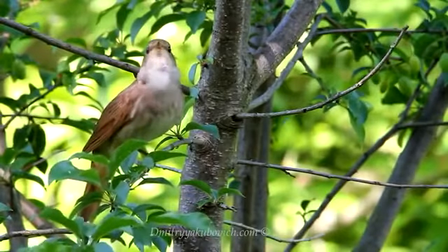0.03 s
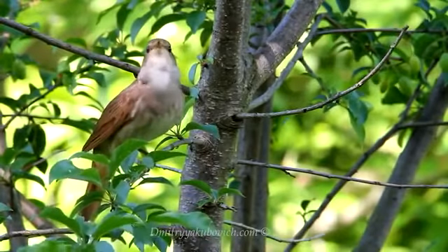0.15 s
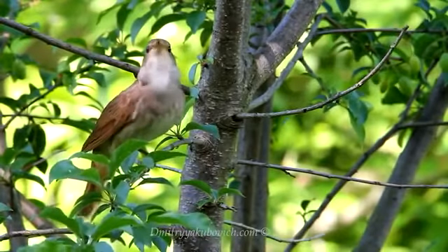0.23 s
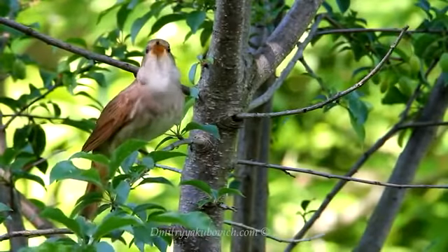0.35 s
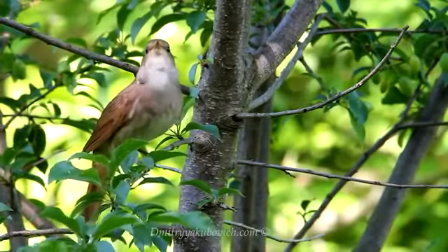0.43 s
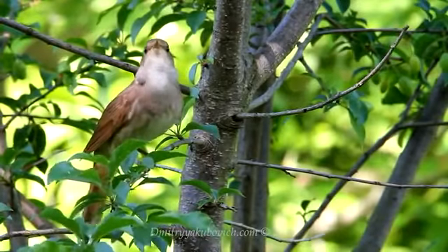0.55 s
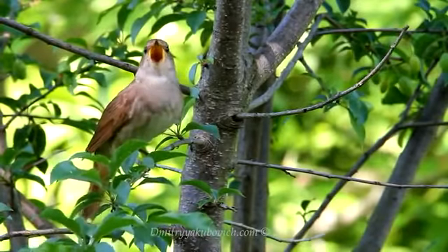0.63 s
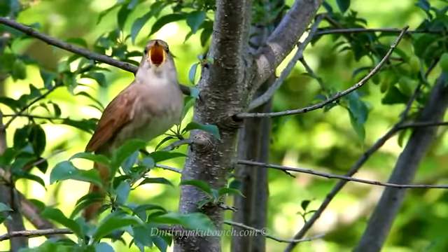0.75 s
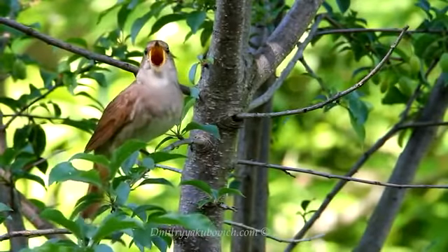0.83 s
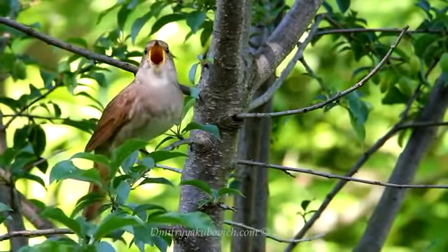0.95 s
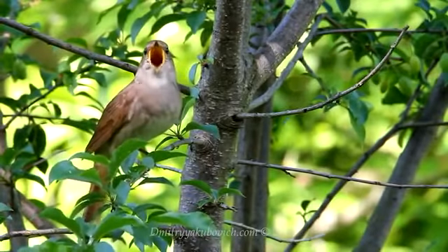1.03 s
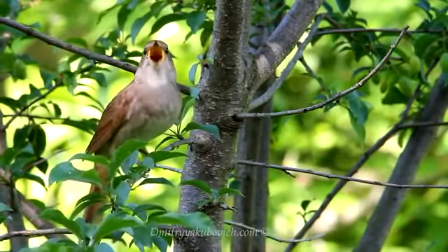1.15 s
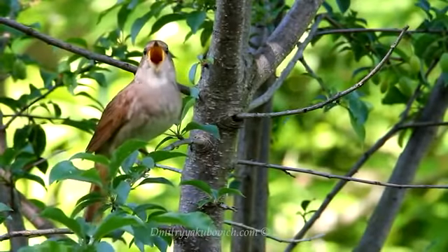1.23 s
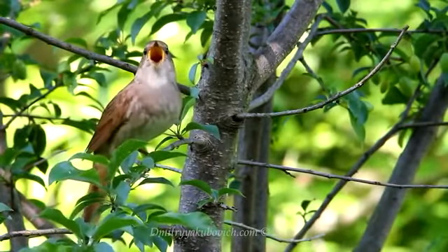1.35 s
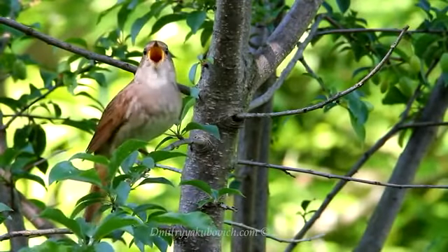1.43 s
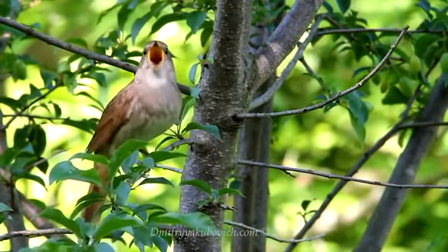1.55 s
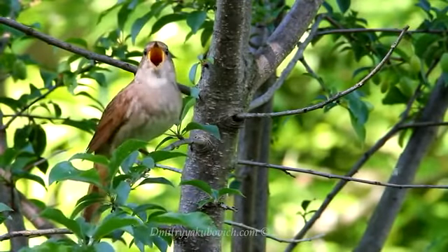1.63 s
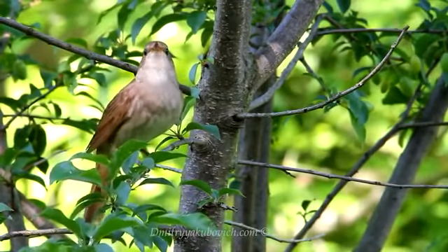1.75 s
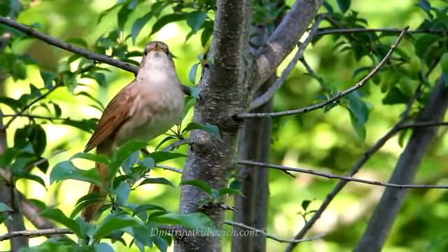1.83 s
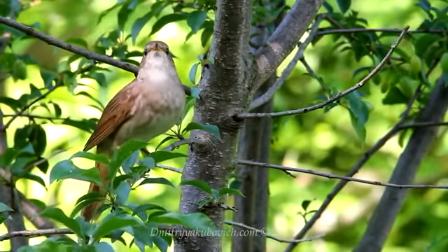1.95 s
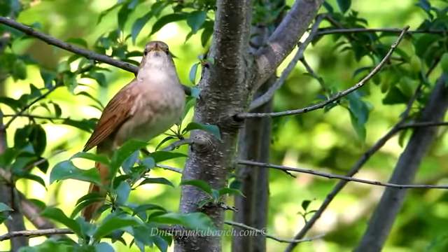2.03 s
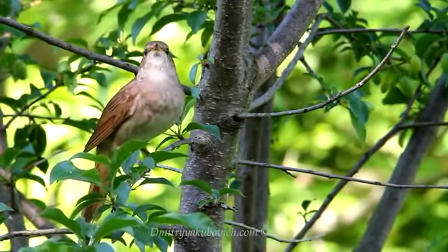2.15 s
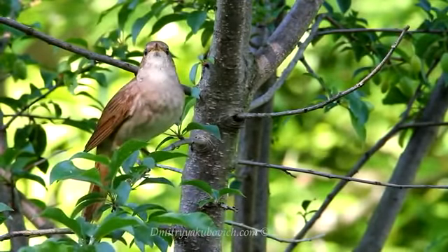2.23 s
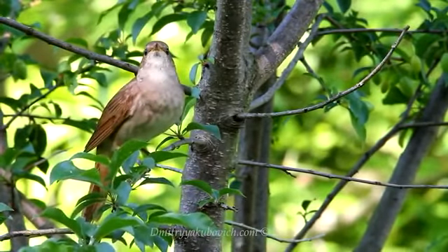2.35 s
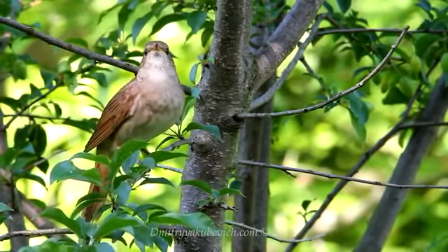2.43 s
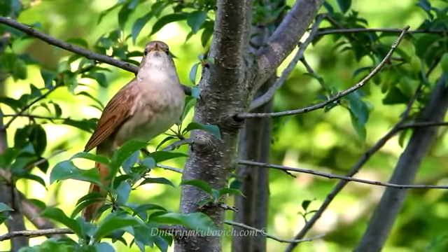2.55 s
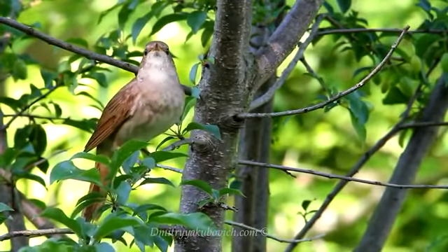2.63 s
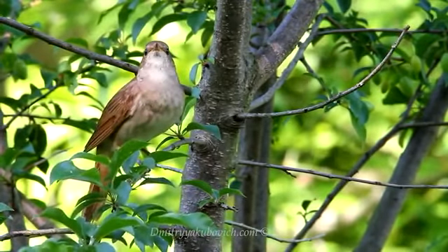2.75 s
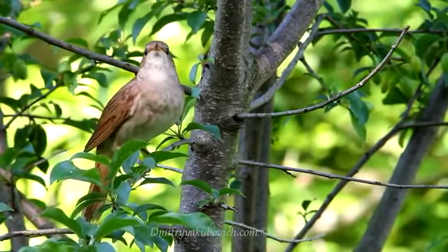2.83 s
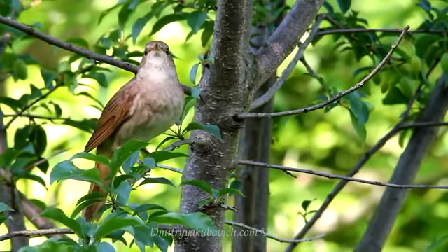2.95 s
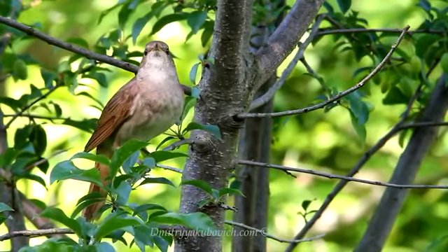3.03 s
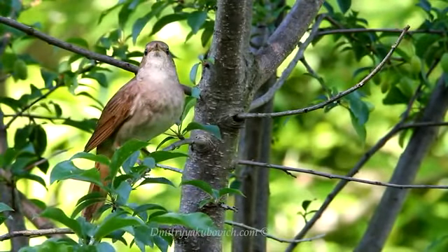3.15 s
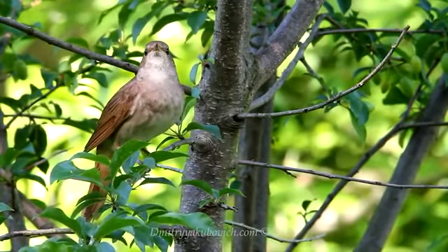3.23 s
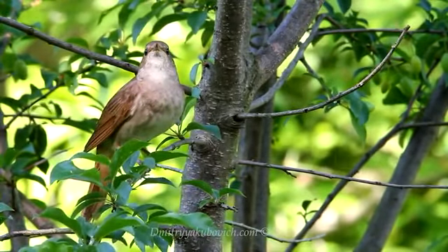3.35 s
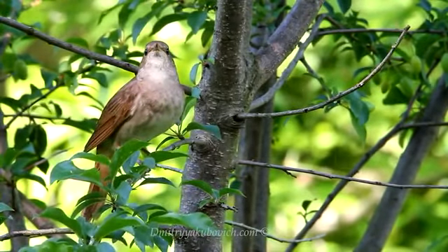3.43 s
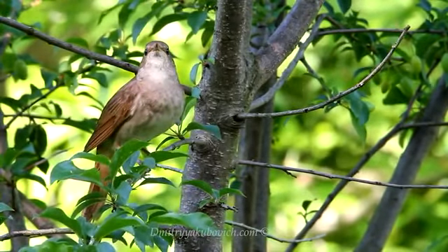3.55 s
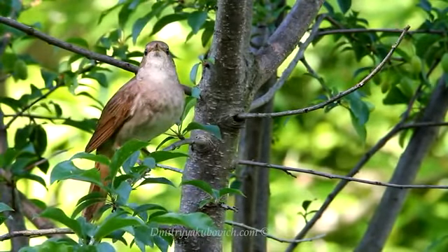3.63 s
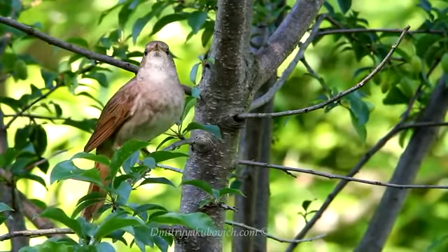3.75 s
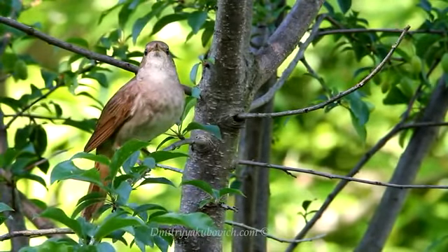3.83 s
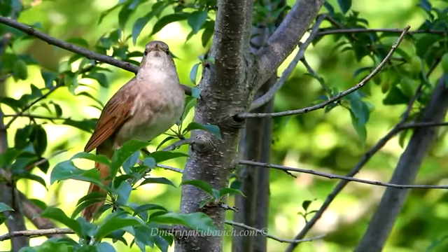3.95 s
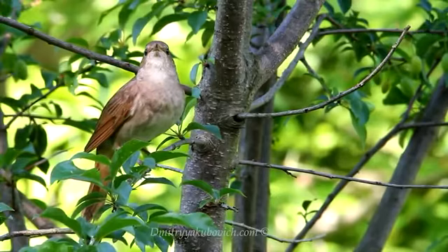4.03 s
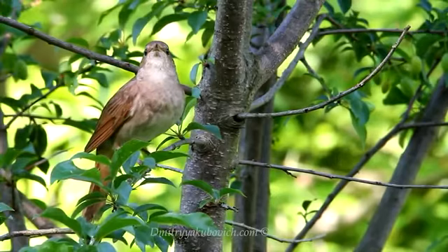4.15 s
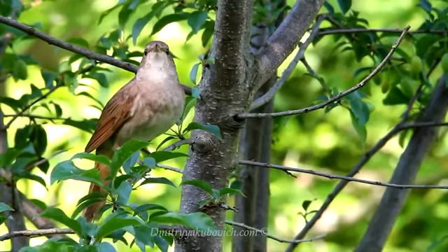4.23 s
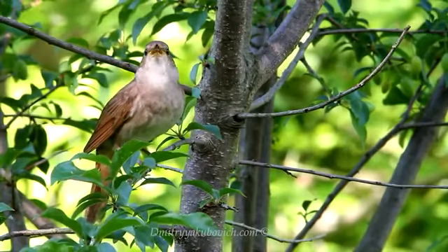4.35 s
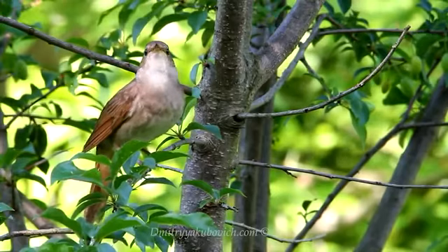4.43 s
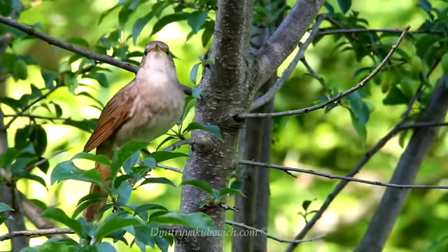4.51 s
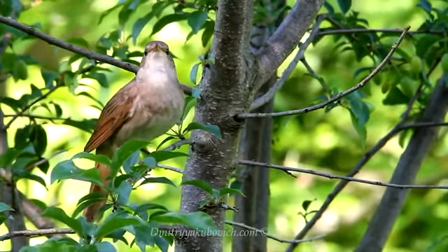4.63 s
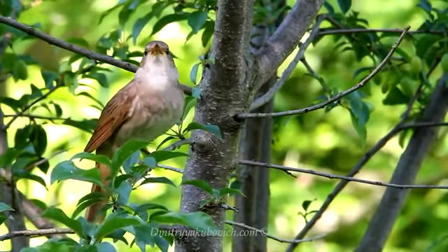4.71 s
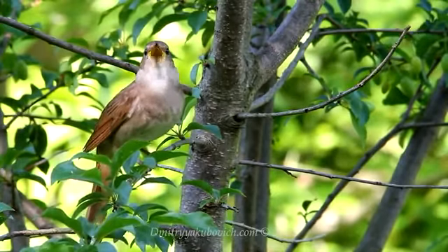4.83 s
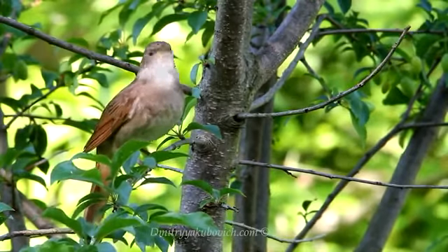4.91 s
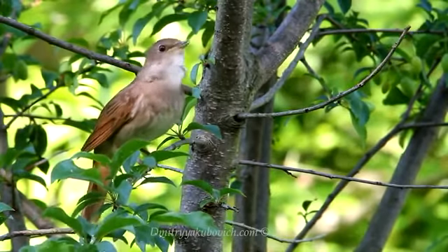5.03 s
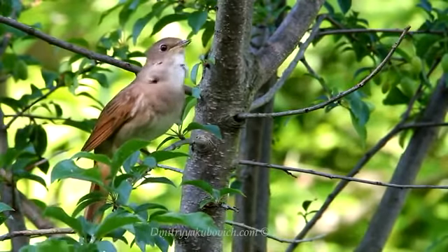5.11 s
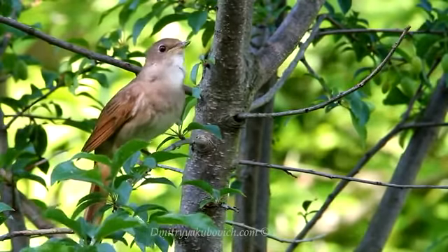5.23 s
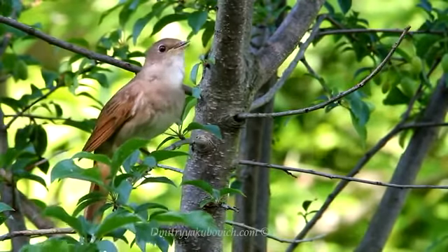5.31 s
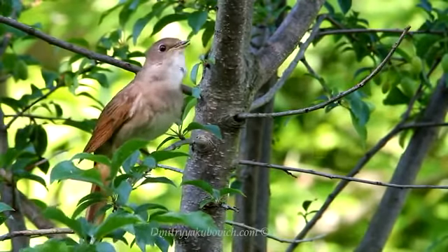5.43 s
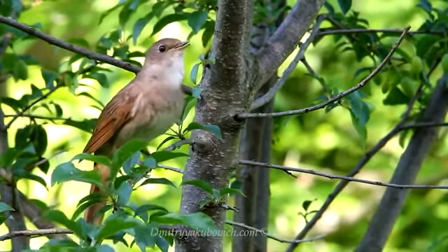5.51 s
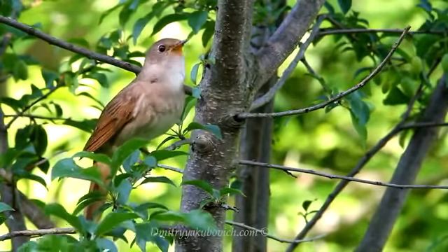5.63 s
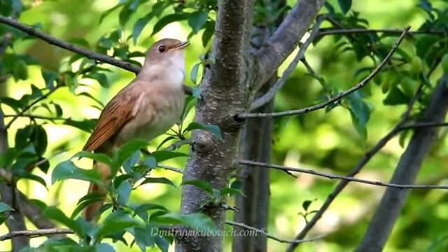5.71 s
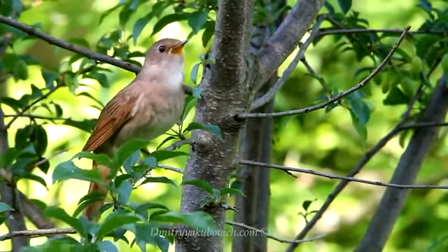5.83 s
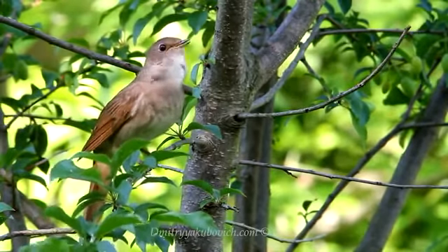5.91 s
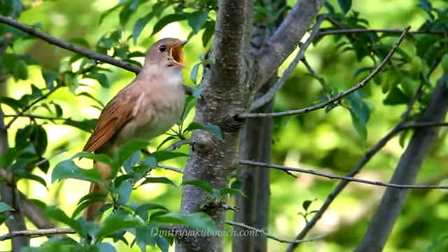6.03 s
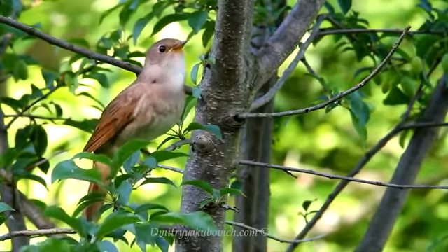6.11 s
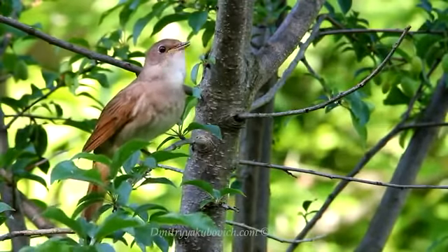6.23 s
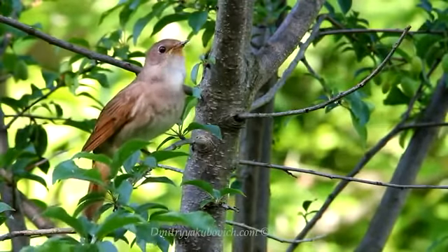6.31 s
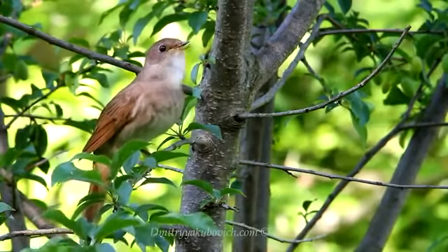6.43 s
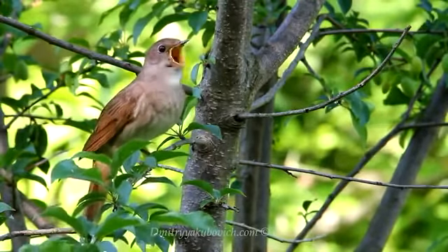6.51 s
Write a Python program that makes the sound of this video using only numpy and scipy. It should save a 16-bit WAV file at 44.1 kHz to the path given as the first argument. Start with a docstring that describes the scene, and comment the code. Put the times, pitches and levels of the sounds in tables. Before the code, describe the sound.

Outdoors among trees, one loud close songbird: short hollow chucks with faint high slurs between them, then a harsh machine-like rattle at about fourteen beats a second. A gap of over two seconds leaves only blurred twitter and thin whistles from deeper in the wood, with a dim motor rumble. The song resumes with clear swelling whistles, breathy falling sighs, a low moan and two explosive, fast descending flourishes. Leaves scatter a short, light echo.

```python
"""A nightingale sings close by: syrinx tones with weak harmonics make low chucks, swelling whistles, single
calls and two cascades of steep sweeps; sighs are falling notes whose harmonics outweigh the fundamental; noise
bursts and uneven pulses make a rattle of double clicks. Other birds answer with slides from deeper in the wood;
quick sine chirps and noisy flurries, near or far, are heard only as echo. Decaying noise echoes scatter the
notes. Behind lie filtered-noise air and a far motor's hum and rumble. A limiter ducks them under the loud
notes."""
import sys
import numpy as np
from scipy import signal
from scipy.fft import rfft, irfft
from scipy.io import wavfile
from scipy.ndimage import uniform_filter1d, minimum_filter1d

SR = 44100
rng = np.random.default_rng(int(sys.argv[2]) if len(sys.argv) > 2 else 0)


def put_to_file(sound):
    """Save the sound as 16-bit audio at rate SR, in the file named by the first command-line argument."""
    columns = np.atleast_2d(sound).T  # one column per channel
    safe = np.clip(columns, -1, 1)
    whole_steps = np.round(safe * 32767)
    wavfile.write(sys.argv[1], SR, whole_steps.astype(np.int16))


N = 289737
TIME_S = np.arange(N) / SR

# Levels are source levels, ahead of scattering and limiter.
# air spectrum: (frequency [Hz], gain [dB])
AIR_SPECTRUM = [(25, -14.5), (100, -7), (200, -16), (400, -18), (800, -19.5), (1500, -23), (3100, -22.5),
                (5000, -26.5), (8000, -29.5), (15000, -35.5)]
# far motor hum: (frequency [Hz], rms level before swell and wander [dB])
MOTOR_HUM = [(73.2, -60.5), (109.8, -61.5), (410, -69.5)]
# quick chirps and noisy flurries, heard as echo: (from [s], to [s], rate [1/s], chirp length [s],
# lowest centre [Hz], highest centre [Hz], top level [dB])
CHIRP_FLURRIES = [(0, 1.5, 32, 0.014, 2110, 4730, -44.5), (1.9, 3.3, 45.5, 0.018, 1990, 5440, -47.5),
                  (1.951, 2.95, 220, 0.0117, 2900, 6850, -52), (2.77, 2.87, 73, 0.027, 1890, 2640, -49),
                  (2.907, 3.02, 200, .016, 4300, 6370, -45.5), (3.086, 3.19, 54, 0.031, 2720, 3080, -44),
                  (3.249, 3.6, 46, .03, 3056, 3400, -57.5), (3.511, 3.76, 144, 0.015, 3560, 5540, -53),
                  (4.03, 4.17, 58, 0.031, 1650, 2170, -57), (4.261, 4.36, 57, 0.019, 2460, 2750, -55),
                  (5.195, 5.235, 350, 0.0088, 4000, 7150, -40),
                  (5.58, 5.615, 420, 0.0093, 3980, 6690, -39.5)]
# clearest far notes: (time [s], length [s], start pitch [Hz], end pitch [Hz], level [dB])
FAR_ANSWERS = [(1.70, 0.067, 2426, 2265, -40.5), (1.765, 0.064, 2260, 1922, -48),
               (1.832, 0.079, 3600, 3257, -45.5), (2.001, 0.11, 1776, 1708, -53.5),
               (2.069, .067, 2790, 3004, -38), (2.177, 0.03, 4310, 5060, -44),
               (2.18, 0.077, 1526, 1318, -53), (2.296, 0.05, 3210, 3370, -45),
               (2.337, 0.15, 3767, 3600, -38), (2.37, .45, 1795, 1966, -52),
               (2.526, 0.026, 5000, 4080, -42.5), (2.672, 0.041, 5080, 4150, -43),
               (2.763, .066, 3150, 3670, -44), (2.868, 0.093, 1560, 1406, -58),
               (2.965, 0.089, 3230, 3680, -44), (3.053, 0.051, 2890, 3315, -41.5),
               (3.125, 0.083, 4000, 3440, -45), (3.207, 0.041, 2800, 3220, -46),
               (3.404, 0.023, 7600, 7030, -50), (3.9, 0.052, 3095, 2520, -47),
               (3.959, 0.022, 2680, 3150, -43)]
# soft slurs between the loud notes: (time [s], length [s], start pitch [Hz], end pitch [Hz], level [dB])
SOFT_SLURS = [(.128, 0.1, 3280, 3650, -42.5), (.258, 0.096, 2030, 2033, -43.5),
              (.285, 0.057, 4960, 4160, -36.5), (.349, .11, 2575, 2310, -41), (.40, 0.081, 4940, 3940, -44),
              (.523, .084, 3363, 3530, -38.5), (.55, 0.15, 5760, 6160, -47.5),
              (.644, 0.067, 4750, 4800, -41), (4.385, 0.054, 2430, 2600, -46.5),
              (5.40, 0.029, 2616, 2560, -39.5), (5.88, 0.13, 4000, 3740, -42.5)]
# sighs: (time [s], length [s], level [dB])
SIGH_NOTES = [(4.576, .15, -39), (4.93, .14, -39), (5.269, 0.14, -39), (5.676, .14, -35),
              (6.524, 0.13, -36)]
# throat response in a sigh: (frequency [Hz], gain [dB])
SIGH_THROAT_GAIN = [(1500, -15.5), (2400, -15.5), (3050, -3), (3900, -0.5), (4500, -7), (5300, 5),
                    (7000, -6), (8500, -15), (12000, -5)]
# beak response for harmonics: (frequency [Hz], gain [dB])
BEAK_GAIN = [(1500, -5), (3000, 1.5), (5500, -7.5), (8200, -17.5), (10000, 8.5), (12500, 5.5), (15000, -17)]
# chucks: (time [s], length [s], resting pitch [Hz], level [dB])
CHUCK_NOTES = [(0.0623, 0.028, 1033, -14.5), (0.207, 0.026, 990, -14), (0.3455, .023, 980, -12.5),
               (.478, 0.023, 938, -14), (0.6136, .024, 987, -13), (5.4684, 0.07, 1629, -21.5),
               (5.959, 0.064, 1662, -21), (6.429, 0.07, 1693, -18)]
# rattle beats: (time [s], relative level of first click [dB])
RATTLE_BEATS = [(.731, 0.5), (0.8016, 1), (0.8711, 1), (0.9373, -2), (1.007, -2.5), (1.0781, -2.5),
                (1.15, 2), (1.2162, -2.5), (1.2885, -4), (1.3616, -3.5), (1.4314, -7), (1.5048, 0),
                (1.5751, -7), (1.6503, -2), (1.7254, -6)]
# click spectrum: (frequency [Hz], gain [dB])
CLICK_SPECTRUM = [(400, -67.5), (900, -36.5), (1500, -33), (2000, -22), (2700, -11), (3600, -3),
                  (5400, -0.5), (7300, -5), (8400, -13.5), (10200, -7), (11300, -9), (12500, 1.5),
                  (14000, -13.5), (16000, -33)]
# swelling whistles: (start [s], slur [s], held pitch [Hz], level at top of swell [dB], extra of final push [dB])
SWELLING_WHISTLES = [(4.362, 4.519, 3240, -23.5, 14.5), (4.794, 4.948, 3273, -15.5, 9)]
# high peep and low moan: (time [s], length [s], start [Hz], middle [Hz], end [Hz], level [dB])
SINGLE_CALLS = [(1.802, .024, 9450, 7586, 7660, -10.5), (5.162, .097, 1225, 1227, 873, -28)]
# cascades: (centre of first sweep [s], sweep spacing [s], sweeps [count], first pitch [Hz], last pitch [Hz],
# level [dB], last sweep relative [dB])
SWEEP_CASCADES = [(5.673, .0127, 6, 6160, 3006, 0.5, -11.5), (6.1304, .0126, 7, 6396, 3040, 1.5, -9)]

AIR_DB, RUMBLE_DB = -54, -60
SIGH_TOP_HZ, SIGH_REST_HZ, SIGH_FALL_S = 2550, 1508, 0.047
CHUCK_TOP_HZ, CHUCK_FALL_S, CHUCK_HELD_DB = 2856, 0.0074, -11.5
FIRST_GAP_S, GAP_S, GAP_SETTLE_S = 0.012, 0.0122, 0.15  # second click lags slightly more along the rattle
CLICK_PEAK_S = 0.004  # from start of burst to peak of its envelope
CLICKS_DB, SECOND_CLICK_DB = 1, 0.5  # gain of all clicks; relative level of the second
SHARP_HZ, SETTLE_S = 190, 0.01565  # a whistle starts sharp and settles
DROP_HZ, DROP_S, AFTER_SLUR_S = 906, 0.007, 0.0266  # slur that ends it
SWELL_FROM_DB, PUSH_S, LET_GO_DB = -24, 0.012, -2.5
SWEEP_FIRST_S, SWEEP_LAST_S = 0.0063, 0.017  # sweeps lengthen along a cascade
SWEEP_OCTAVES, DEEPEST_AT, DEEP_SHARE = 1.284, 0.36, 0.416  # deepest sweep; place and reach as shares of cascade
FIRST_SWEEP_DB = -8.5  # a cascade starts softly
TOP_HZ = 15100


def undb(db):
    """Amplitude ratio of a level in dB."""
    return 10 ** (np.asarray(db) / 20)


def unit(x):
    """Scale to rms 1."""
    return x / np.sqrt(np.mean(x ** 2))


def clock(length_s):
    """Sample times [s] of a short sound."""
    return np.arange(int(length_s * SR)) / SR


def add(out, start_s, x):
    """Mix x into out from start_s on."""
    i = max(int(start_s * SR), 0)
    out[i:i + len(x)] += x[:max(N - i, 0)]


def noise(size):
    """White noise."""
    return rng.standard_normal(size)


def colour(x, points):
    """Filter by (Hz, dB) points, interpolated over log frequency."""
    hz, db = np.transpose(points)
    bins_hz = np.maximum(np.fft.rfftfreq(len(x), 1 / SR), 1)
    gain = undb(np.interp(np.log(bins_hz), np.log(hz), db))
    return irfft(rfft(x) * gain, len(x))


def walk(size, points_per_s):
    """Random wander: straight lines between normally distributed points."""
    t = np.arange(size) / SR * points_per_s
    points = rng.standard_normal(int(t[-1]) + 2)
    return np.interp(t, np.arange(len(points)), points)


def gate(t, rise_s, fall_s):
    """Rounded opening and closing of a note."""
    opening = np.sin(np.pi / 2 * np.minimum(t / rise_s, 1)) ** 2
    closing = np.sin(np.pi / 2 * np.minimum((t[-1] - t) / fall_s, 1)) ** 2
    return opening * closing


def arc(t, start_hz, middle_hz, end_hz):
    """Pitch bending smoothly through three points: a parabola in log frequency."""
    curve = np.polyfit([0, 0.5, 1], np.log([start_hz, middle_hz, end_hz]), 2)
    return np.exp(np.polyval(curve, t / t[-1]))


def glide(t, start_hz, end_hz, ease):
    """Pitch sliding from start to end; the larger ease, the sooner it settles."""
    return end_hz * (start_hz / end_hz) ** ((1 - t / t[-1]) ** ease)


def phase_of(hz):
    """Phase [rad] summed from a pitch track."""
    return 2 * np.pi * np.cumsum(hz) / SR


def syrinx(hz, second_db, third_db, waver, rasp_db, fourth_db=-60):
    """Sine with weak harmonics 2-4 passed by the beak; turbulent air shakes its pitch and strength."""
    hz = hz * (1 + waver * walk(len(hz), 884))
    phase = phase_of(hz)
    tone = np.sin(phase)
    for k, db in enumerate([second_db, third_db, fourth_db], 2):
        beak_db = np.interp(k * hz, *np.transpose(BEAK_GAIN))
        audible = k * hz < SR / 2
        tone += undb(db + beak_db) * np.sin(k * phase) * audible
    return tone * (1 + undb(rasp_db) * walk(len(hz), 2500))


def hiss(size):
    """Air rushing through the throat and open beak: filtered noise, rms 1."""
    spectrum = [(1500, -35), (3500, -16), (5500, -1.0), (8200, -8.5), (10500, -3.5), (13000, 3.0), (16000, -21.5)]
    return unit(colour(noise(size), spectrum))


def slurs(notes, ease, second_db, third_db, waver, rasp_db, hiss_db, rise_share, fall_share):
    """Syrinx notes sliding between two pitches, with hiss; rise and fall are shares of the length."""
    out = np.zeros(N)
    for start_s, length_s, first_hz, last_hz, db in notes:
        t = clock(length_s)
        tone = syrinx(glide(t, first_hz, last_hz, ease), second_db, third_db, waver, rasp_db)
        tone = tone + undb(hiss_db) * hiss(len(t))
        add(out, start_s, undb(db) * gate(t, rise_share * length_s, fall_share * length_s) * tone)
    return out


def wood(x, twigs_db, leaves_db, trunks_db, direct=1):
    """Scatter from near twigs and the crown of leaves, and a longer, duller echo from far trunks."""
    t = clock(0.8)
    response = np.zeros(len(t))
    response[0] = direct
    leaves_tint = [(1000, -2.0), (2500, 2.0), (5500, -1), (8000, 2.0), (12000, 2.5), (15000, -6)]
    # level [dB], 60 dB decay time [s], onset [s], spectrum
    layers = [(twigs_db, 0.03, 0.002, [(1000, 4), (3000, 3.5), (12000, -1)]),
              (leaves_db, 0.2, 0.008, leaves_tint),
              (trunks_db, 0.95, 0.04, [(1000, 6.0), (3000, -2.5), (6000, -7.5), (12000, -17)])]
    for db, t60_s, onset_s, tint in layers:
        decay = np.exp(-np.log(1000) * t / t60_s)
        echoes = noise(len(t)) * decay * (1 - np.exp(-(t / onset_s) ** 2))
        response += undb(db) * colour(echoes / np.sqrt(np.sum(echoes ** 2)), tint)
    return signal.fftconvolve(x, response)[:N]


def air():
    """Soft outdoor air: filtered noise of wandering level."""
    return unit(colour(noise(N), AIR_SPECTRUM)) * undb(AIR_DB + 1.13 * walk(N, 3.596))


def motor():
    """Far motor: hum wavering in pitch and level plus low rumble, swelling and fading together."""
    hum = np.zeros(N)
    for hz, rms_db in MOTOR_HUM:
        level = undb(rms_db + 2.1 * walk(N, 5.7)) * np.sqrt(2)
        hum += level * np.sin(phase_of(hz * (1 + 0.02005 * walk(N, 11))))
    spectrum = [(30, -21.0), (70, -1.5), (130, -1.5), (250, -9.0), (420, -7.5), (1200, -29.5), (5000, -54.5)]
    rumble = unit(colour(noise(N), spectrum))
    swell_db = np.interp(TIME_S, [0, 1.5, 2.6, 3.8, 4.5, 6.5], [-1.5, -8.0, 3.0, 0, 0, -1.5])
    return undb(swell_db) * (hum + undb(RUMBLE_DB) * rumble)


def chirp_flurries():
    """Quick sine chirps of random pitch, slide and level, one per time slot; dense ones blur to noise."""
    out = np.zeros(N)
    for begin_s, end_s, rate_hz, length_s, low_hz, high_hz, db in CHIRP_FLURRIES:
        count = int((end_s - begin_s) * rate_hz)
        for k, (when, pitch, slope, size) in enumerate(rng.random((count, 4))):
            t = clock(length_s)
            slide_octaves = 0.0122 / length_s * (slope - 0.5)  # short chirps slide furthest
            hz = low_hz * (high_hz / low_hz) ** pitch * 2 ** (slide_octaves * (t / t[-1] - 0.5))
            chirp = gate(t, 0.01, 0.0019) * np.sin(phase_of(hz))
            add(out, begin_s + (k + when) / rate_hz, undb(db - 5.1 * size) * chirp)
    return out


def answers_and_flurries():
    """Slurred answers from deeper in the wood, and chirps and flurries near or far, heard only as echo."""
    answers = slurs(FAR_ANSWERS, ease=2.6, second_db=-38, third_db=-49.5, waver=0.012, rasp_db=-10.5,
                    hiss_db=-44, rise_share=0.13, fall_share=0.13)
    answers = wood(answers, twigs_db=-19.5, leaves_db=-5.5, trunks_db=-7)
    flurries = wood(chirp_flurries(), twigs_db=-4, leaves_db=-2.5, trunks_db=-5.5, direct=0)  # echo only
    return answers + flurries


def sighs(fourth_db=-12, rasp_db=-9):
    """A soft note falls and levels out; the throat favours its harmonics over the fundamental."""
    out = np.zeros(N)
    for start_s, length_s, db in SIGH_NOTES:
        t = clock(length_s)
        hz = SIGH_REST_HZ + (SIGH_TOP_HZ - SIGH_REST_HZ) * np.exp(-(t / SIGH_FALL_S) ** 2)
        phase = phase_of(hz * (1 + 0.0095 * walk(len(t), 877)))
        fading_db = -14 * (t / length_s) ** 2  # harmonics 3 and 4 die away first
        tone = np.zeros(len(t))
        for k, harmonic_db in enumerate([0, 0, fading_db, fading_db + fourth_db], 1):
            throat_db = np.interp(k * hz, *np.transpose(SIGH_THROAT_GAIN))
            tone += undb(throat_db + harmonic_db) * np.sin(k * phase)
        rasp = 1 + undb(rasp_db) * walk(len(t), 2500)
        add(out, start_s, undb(db) * gate(t, 0.028, 0.044) * tone * rasp)
    return out


def asides():
    """Soft slides and sighs between the loud notes."""
    slides = slurs(SOFT_SLURS, ease=1.3, second_db=-24, third_db=-41, waver=0.014, rasp_db=-9.5,
                   hiss_db=-33, rise_share=0.22, fall_share=0.077)
    return sighs() + slides


def chucks(accent_s=0.0096, hiss_db=-25):
    """A hard push of air starts each note high; the pitch relaxes and the note is held softly."""
    out = np.zeros(N)
    held = undb(CHUCK_HELD_DB)
    for start_s, length_s, rest_hz, db in CHUCK_NOTES:
        t = clock(length_s)
        hz = rest_hz + (CHUCK_TOP_HZ - rest_hz) * np.exp(-t / CHUCK_FALL_S)
        push = held + (1 - held) * np.exp(-(t / accent_s) ** 4)
        tone = syrinx(hz, second_db=-24.0, third_db=-43, fourth_db=-54, waver=0.024, rasp_db=-30.5)
        tone = tone + undb(hiss_db) * hiss(len(t))
        add(out, start_s, undb(db) * push * gate(t, 0.073 * length_s, 0.0066) * tone)
    return out


def click(rise_s, ring_s, top_hz=6300, low_hz=4300, chirp_db=-4):
    """The syrinx snaps open: a burst of air with a harsh falling chirp in it."""
    t = clock(0.014) - CLICK_PEAK_S
    hz = low_hz + (top_hz - low_hz) / (1 + np.exp(t / 0.001185))
    hz = hz * np.exp(0.0603 * rng.standard_normal())
    chirp = syrinx(hz, second_db=-4.0, third_db=-31.5, waver=0.1233, rasp_db=-8)
    shape = np.exp(np.where(t < 0, t / rise_s, -(np.abs(t) / ring_s) ** 0.91))
    burst = colour(shape * (noise(len(t)) + undb(chirp_db) * chirp), CLICK_SPECTRUM)
    return unit(burst) * np.sqrt(np.mean(shape ** 2)) / 2


def creak(pulse_hz=950, length_s=0.019):
    """A swelling creak of uneven pulses and faint noise."""
    t = clock(length_s)
    cycles = np.cumsum(pulse_hz * (1 + 0.14 * walk(len(t), 810))) / SR
    pulses = np.diff(np.floor(cycles), prepend=0) + undb(-22.5) * noise(len(t))
    return pulses * gate(t, 0.015, 0.0043) * undb(2 * walk(len(t), 900))


def rattle(lead_s=0.0255):
    """Each beat is a creak, rung through the throat and wide-open beak, and two clicks."""
    clicks, creaks = np.zeros(N), np.zeros(N)
    for first_s, first_db in RATTLE_BEATS:
        settling = np.exp((RATTLE_BEATS[0][0] - first_s) / GAP_SETTLE_S)
        second_s = first_s + GAP_S + (FIRST_GAP_S - GAP_S) * settling
        add(clicks, first_s - CLICK_PEAK_S, undb(first_db) * click(rise_s=0.00037, ring_s=0.0015))
        add(clicks, second_s - CLICK_PEAK_S, undb(SECOND_CLICK_DB) * click(rise_s=0.00083, ring_s=0.0013))
        add(creaks, first_s - lead_s, creak())
    throat = [(900, -26.5), (2200, -18), (3100, -6.5), (3900, 7.5), (5000, -6.0), (7500, -20),
              (11500, -17.5), (15000, -36.0)]
    return undb(CLICKS_DB) * clicks + colour(creaks, throat)


def whistle(pitch_hz, blow_db):
    """A clear note with airy edge; blowing harder shifts the third harmonic and thins the edge."""
    third_db = np.interp(blow_db, [-27.5, -17.5, 2], [-40, -22, -25])
    tone = syrinx(pitch_hz, second_db=-29.5, third_db=third_db, fourth_db=-48.5, waver=0.0072, rasp_db=-29.5)
    halo_spectrum = [(2500, -31.5), (3800, 3.5), (5200, -17), (6500, -14.5), (15000, -45.5)]
    halo = unit(colour(noise(len(pitch_hz)), halo_spectrum))
    halo_db = -27 - 0.38 * np.maximum(blow_db + 24, 0)
    breath = undb(-37.5) * hiss(len(pitch_hz)) + undb(halo_db) * halo
    return (tone + breath) * undb(blow_db)


def swelling_whistles():
    """The breath swells steadily, pushes through a downward slur and lets go."""
    out = np.zeros(N)
    for start_s, slur_s, held_hz, db, push_db in SWELLING_WHISTLES:
        t = clock(slur_s - start_s + AFTER_SLUR_S)
        late_s = start_s + t - slur_s
        dropped = (1 + np.tanh(late_s / DROP_S / 2)) / 2
        pitch_hz = held_hz + SHARP_HZ * np.exp(-t / SETTLE_S) - DROP_HZ * dropped
        swell = np.interp(t, [0, slur_s - start_s], [undb(SWELL_FROM_DB), 1])
        push = push_db * np.exp(-(late_s / PUSH_S) ** 2)
        blow_db = db + 20 * np.log10(swell) + push + LET_GO_DB * dropped ** 2
        add(out, start_s, whistle(pitch_hz, blow_db) * gate(t, 0.0033, 0.0023))
    return out


def single_calls():
    """Clear whistled notes that bend in pitch, rise and fade."""
    out = np.zeros(N)
    for start_s, length_s, first_hz, middle_hz, last_hz, db in SINGLE_CALLS:
        t = clock(length_s)
        note = whistle(arc(t, first_hz, middle_hz, last_hz), db)
        add(out, start_s, note * gate(t, 0.4 * length_s, 0.37 * length_s))
    return out


def cascades():
    """Steep falling sweeps in quick succession, each lower and longer, flatten out into a whistle."""
    sweeps = []
    for start_s, spacing_s, count, top_hz, bottom_hz, db, last_db in SWEEP_CASCADES:
        for k, along in enumerate(np.linspace(0, 1, round(count))):
            hz = bottom_hz + (top_hz - bottom_hz) * np.cos(np.pi / 2 * along ** 1.08) ** 2
            length_s = SWEEP_FIRST_S + (SWEEP_LAST_S - SWEEP_FIRST_S) * along ** 2.4
            depth = np.exp(-((along - DEEPEST_AT) / DEEP_SHARE) ** 2)
            reach = 2 ** (SWEEP_OCTAVES / 2 * depth)
            effort_db = db + FIRST_SWEEP_DB * (1 - along) ** 2 + last_db * along ** 6
            begin_s = start_s + k * spacing_s - length_s / 2
            sweeps.append((begin_s, length_s, hz * reach, hz / reach, effort_db))
    return slurs(sweeps, ease=1.05, second_db=-18.5, third_db=-25.0, waver=0.031, rasp_db=-19,
                 hiss_db=-18, rise_share=0.54, fall_share=0.38)


def nightingale():
    """Loud notes scatter a little; soft notes arrive mostly by way of the leaves."""
    soft = wood(asides(), twigs_db=-9.5, leaves_db=-5.0, trunks_db=-7.5, direct=0.63)
    loud = chucks() + rattle() + swelling_whistles() + single_calls() + cascades()
    return soft + wood(loud, twigs_db=-10, leaves_db=-12.5, trunks_db=-25.5)


def scene():
    """All sources at one microphone, the same left and right."""
    return np.tile(air() + motor() + answers_and_flurries() + nightingale(), (2, 1))


def record(dry, ceiling_db=-3, recovery_db_per_s=30, low_cut_hz=42):
    """Deep bass cut, then a limiter that holds peaks down and recovers slowly, then the top cut."""
    sound = signal.sosfilt(signal.butter(3, low_cut_hz, "high", fs=SR, output="sos"), dry)
    over_db = np.maximum(20 * np.log10(np.abs(sound[0]) + 1e-9) - ceiling_db, 0)
    recovery_db = recovery_db_per_s * TIME_S
    cut_db = np.maximum.accumulate(over_db + recovery_db) - recovery_db
    # centred windows: gain falls smoothly ahead of a peak
    gain = uniform_filter1d(minimum_filter1d(undb(-cut_db), size=129), size=129)
    return signal.sosfilt(signal.ellip(8, 0.2, 70, TOP_HZ, fs=SR, output="sos"), sound * gain)


dry = scene()
out = record(dry)
put_to_file(out)
```